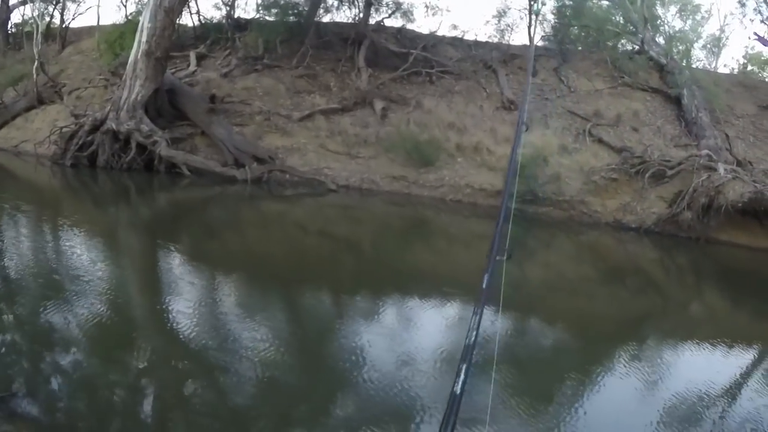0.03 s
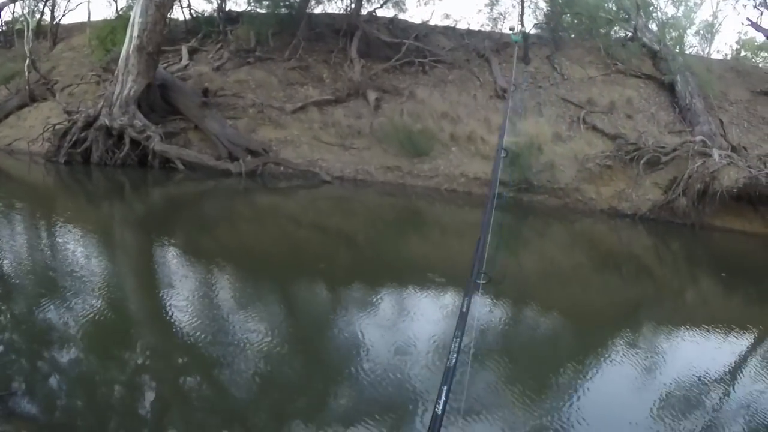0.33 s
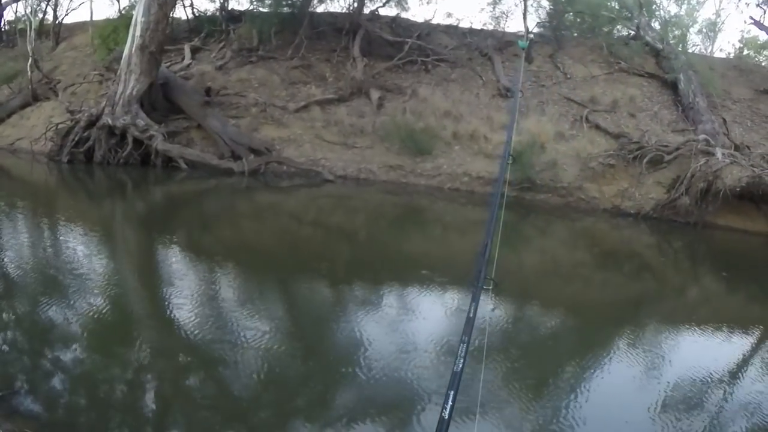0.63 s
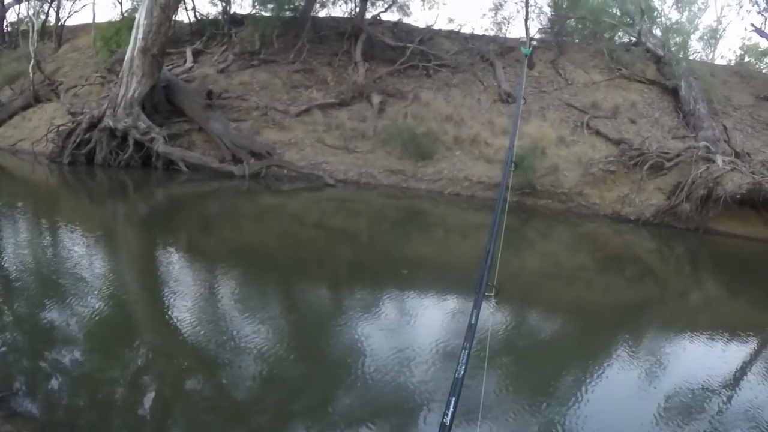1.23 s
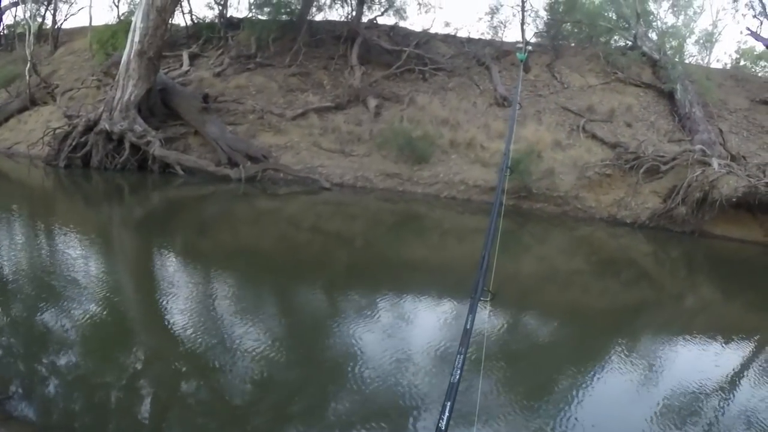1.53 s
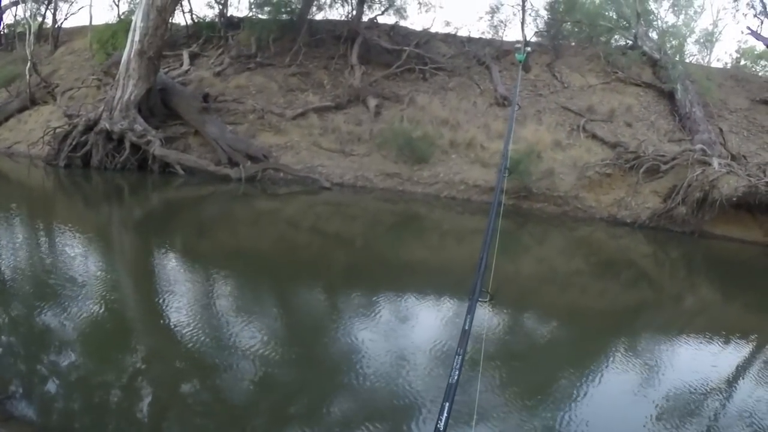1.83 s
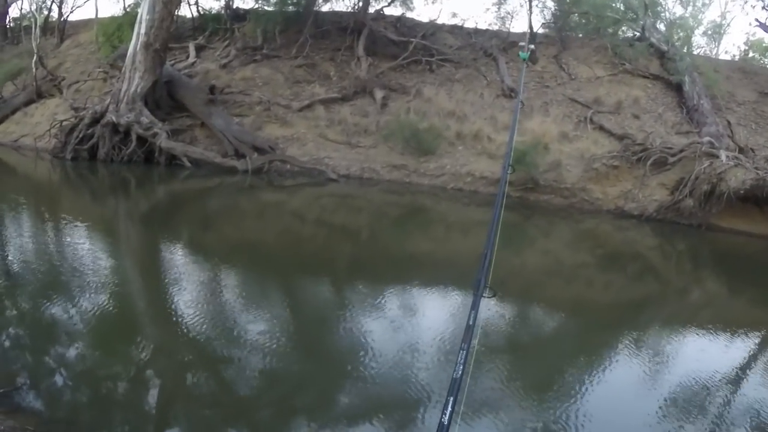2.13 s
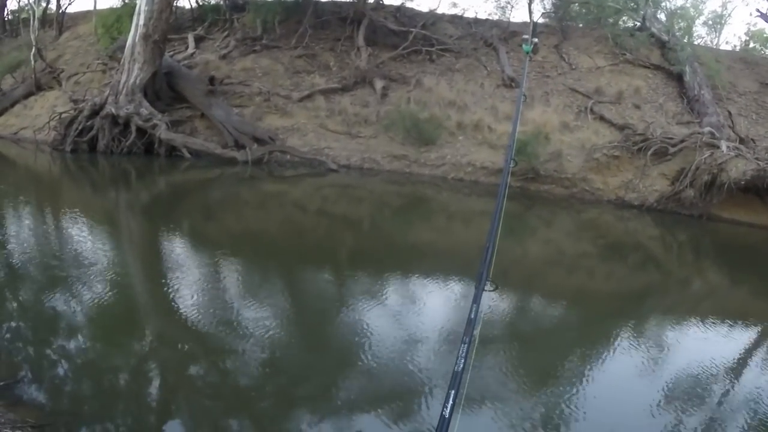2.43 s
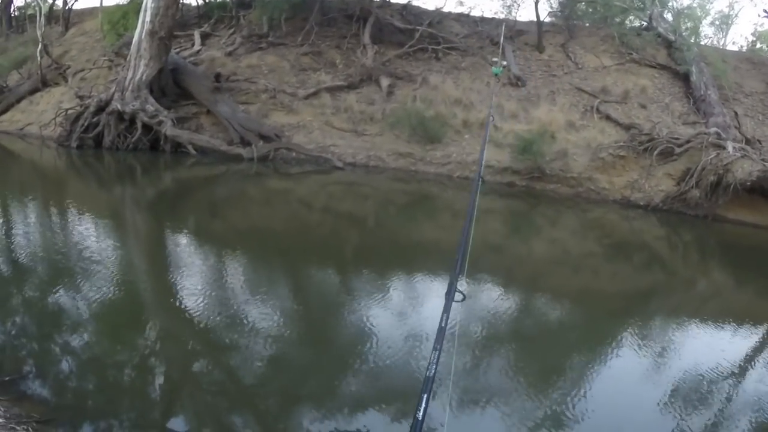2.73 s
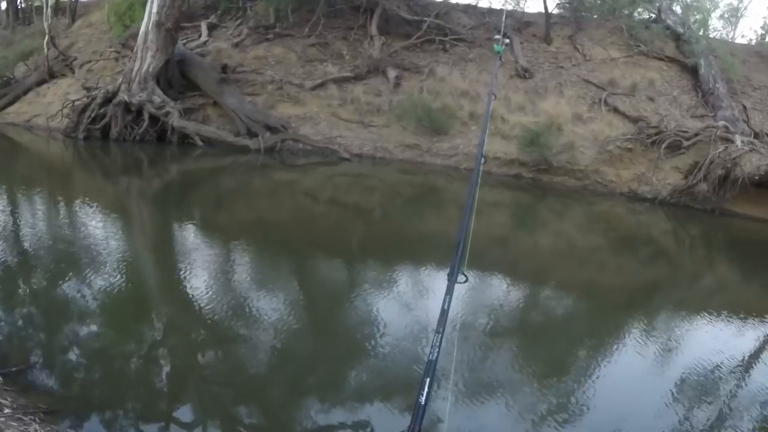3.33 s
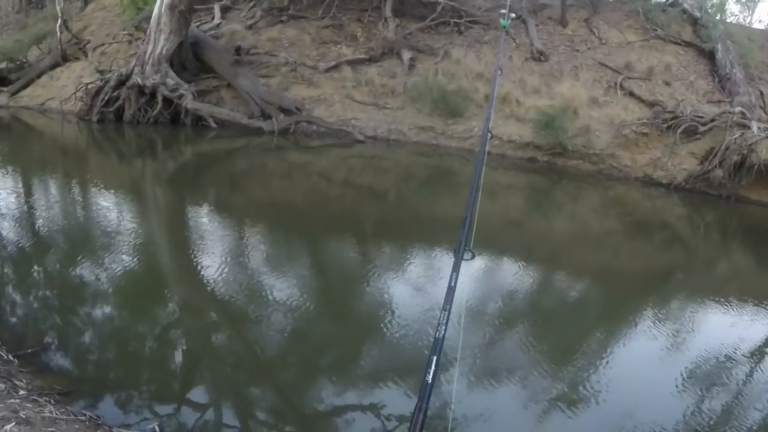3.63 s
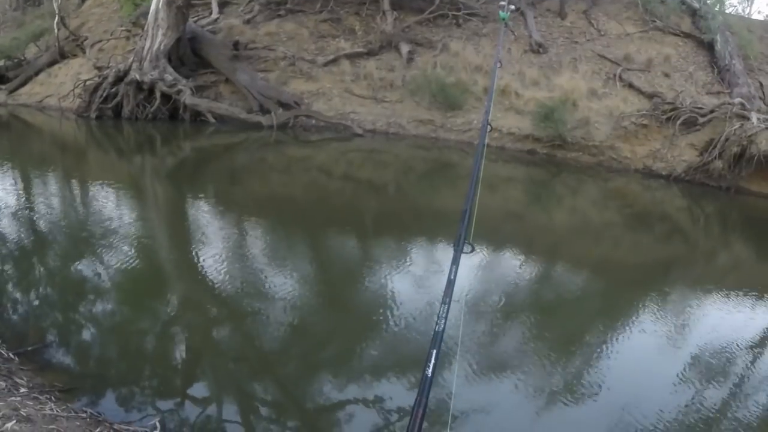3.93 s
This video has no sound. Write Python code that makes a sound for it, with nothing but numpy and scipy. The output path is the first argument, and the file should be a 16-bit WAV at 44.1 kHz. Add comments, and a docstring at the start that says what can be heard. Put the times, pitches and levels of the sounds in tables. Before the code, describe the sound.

Outdoors by a river, a little rod bell gives light, high pings over bumps of wind. After a stronger gust, the sound switches abruptly to a sheltered hiss, with close fabric rubbing and dull knocks on the microphone's housing.

```python
"""A small bell tinkles on a fishing rod tip beside a calm river while wind bumps the microphone.
A clapper strikes the bell's wall; turbulence and single eddies make the low bumps.
Halfway through, a hissier, sheltered microphone takes over: bell and wind drop out, and
the angler's clothing rubs, squeaks and knocks on the camera's case."""
import sys
import numpy as np
from scipy import signal
from scipy.fft import rfft, irfft
from scipy.io import wavfile

SR = 44100
rng = np.random.default_rng(int(sys.argv[2]) if len(sys.argv) > 2 else 0)


def store_pcm(level_fs):
    """Save levels as 16-bit WAV."""
    pcm = np.round(np.clip(level_fs, -1, 1) * 32767).astype(np.int16)
    wavfile.write(sys.argv[1], SR, np.atleast_2d(pcm).T)


N = 176400


def amp(db):
    """Decibels to gain."""
    return 10 ** (np.asarray(db) / 20)


def unit(x):
    """Scales to rms 1."""
    return x / np.sqrt(np.mean(x ** 2) + 1e-20)


def add(mix, start_s, sound):
    """Mixes a sound in at start_s."""
    part = mix[max(round(start_s * SR), 0):][:len(sound)]
    part += sound[:len(part)]


def colour(x, spectrum):
    """Filters x by (freq_hz, level_db) points, to rms 1."""
    hz, db = np.transpose(spectrum)
    gain_db = np.interp(np.log(np.fft.rfftfreq(N, 1 / SR) + 1), np.log(hz), db)
    return unit(irfft(rfft(x) * amp(gain_db), N))


def noise(spectrum):
    """Coloured noise, rms 1."""
    return colour(rng.standard_normal(N), spectrum)


def drift(rate_hz):
    """Random wander near rate_hz, rms 1."""
    f = np.fft.rfftfreq(N, 1 / SR) / rate_hz
    return unit(irfft(rfft(rng.standard_normal(N)) * f * np.exp(-f ** 2), N))


def bell():
    """The clapper strikes the wall, detuning the two lowest modes, and rattles faintly in between."""
    # clapper strikes: start_s, level_db, pitch_hz, ring_s, overtone_db
    strikes = [(0.1367, -40, 4118, 0.12, -24.5), (0.192, -51, 4100, .12, -18),
               (0.197, -40, 4110, .034, -40), (.205, -43, 4010, 0.17, -40), (0.216, -33, 4117, 0.078, -36),
               (0.2762, -40.5, 4120, 0.07, -26), (.403, -56, 4070, .13, -18),
               (.431, -48.5, 4110, .092, -23), (0.4706, -51, 4120, .1, -35), (.505, -48, 4090, .086, -24),
               (0.5427, -42, 4180, 0.039, -31), (0.551, -41.5, 4070, 0.059, -36),
               (0.56, -44, 4100, 0.052, -19), (0.587, -49, 4220, .043, -35), (.8175, -52, 4200, 0.028, -35),
               (1.079, -53.5, 4160, .03, -35), (1.2293, -43, 4110, 0.042, -21)]  # short ring: clapper stays on the wall
    # bell modes: freq_hz, level_db, t60_per_ring
    modes = [(4090, 0, 0.88), (4170, -12.5, 0.73), (4320, -14, 0.18), (5700, -23, .14)]
    nominal_hz, overtone_hz = modes[0][0], 8620
    rattle_end_s, hard_strike_db = 0.6, -37.5
    rattle = [(rattle_end_s * rng.random(), -66 + 2 * rng.standard_normal(), nominal_hz, 0.1, -20)
              for _ in range(24)]
    out, t = np.zeros(N), np.arange(SR // 4) / SR
    for start_s, level_db, pitch_hz, ring_s, overtone_db in strikes + rattle:
        ring = amp(overtone_db - 60 * t / (1.6 * ring_s)) * np.sin(2 * np.pi * overtone_hz * t)
        for k, (mode_hz, mode_db, t60_per_ring) in enumerate(modes):
            hz = mode_hz * pitch_hz / nominal_hz if k < 2 else mode_hz
            ring += amp(mode_db - 60 * t / (ring_s * t60_per_ring)) * np.sin(2 * np.pi * hz * t)
        rise_s = 0.00061 * amp((hard_strike_db - level_db) / 2)  # lighter strikes start rounder
        add(out, start_s, amp(level_db) * np.minimum(t / rise_s, 1) * ring)
    # a small bell barely radiates below its lowest mode
    return signal.sosfilt(signal.butter(20, 3950, "high", fs=SR, output="sos"), out)


def tackle_tick():
    """One light tick of the tackle."""
    # tackle modes: freq_hz, level_db
    modes = [(2940, -51), (5780, -55)]
    start_s, t60_s = 0.4605, 0.017
    t = np.maximum(np.arange(N) / SR - start_s, 0)
    return sum(amp(db - 60 * t / t60_s) * np.sin(2 * np.pi * hz * t) for hz, db in modes)


def wind():
    """Turbulence widens in band with strength; each eddy pushes, then pulls on the microphone."""
    # turbulence strength: time_s, level_db
    strength = [(0, -42.5), (.19, -40.5), (.28, -51.5), (.45, -39.5), (.6, -55.5), (1.02, -54), (1.15, -46),
                (1.29, -54), (1.4, -39.5), (1.5, -53.5), (1.61, -40.5), (1.64, -27.5), (1.77, -29),
                (1.82, -39), (2.03, -45)]
    # light wind spectrum: freq_hz, level_db
    rumble = [(12, -15), (50, 6.5), (120, -5.5), (300, -43), (700, -76)]
    # strong wind spectrum: freq_hz, level_db
    gust = [(15, -17), (60, 4.5), (180, -1.5), (300, -22), (800, -74)]
    # single eddies: centre_s, level_db, pitch_hz
    eddies = [(0.143, -30, 50), (0.202, -30.5, 68.5), (0.333, -26.5, 73), (0.415, -25, 73.4),
              (0.444, -28.5, 108), (0.489, -34.5, 100), (0.535, -29.5, 63), (0.691, -36, 63),
              (1.349, -34, 75), (1.641, -21, 84.6), (1.678, -21.5, 134), (1.698, -25, 115),
              (1.716, -24, 124), (1.763, -25, 184), (1.795, -31.5, 143)]
    gust_from_db, gust_full_db = -46.5, -27
    t = np.arange(N) / SR
    level_db = np.interp(t, *np.transpose(strength))
    blend_rad = np.interp(level_db, [gust_from_db, gust_full_db], [0, np.pi / 2])
    envelope = amp(level_db + 2 * drift(rate_hz=19.4))
    out = envelope * (np.cos(blend_rad) * noise(rumble) + np.sin(blend_rad) * noise(gust))
    for centre_s, eddy_db, pitch_hz in eddies:
        phase = 2 * np.pi * pitch_hz * (t - centre_s)
        out -= amp(eddy_db) * phase * np.exp((1 - phase ** 2) / 2)
    return out


def cloth():
    """Fibres catch and slip on the case in strokes; faster, louder strokes are brighter."""
    # cloth strokes: start_s, length_s, level_db
    strokes = [(2.024, 0.046, -43.5), (2.084, 0.017, -46), (2.195, 0.031, -38.5), (2.182, 1.82, -45),
               (2.324, 0.019, -29.5), (2.347, 0.034, -38), (2.386, 0.054, -40.5), (2.437, 0.039, -34.5),
               (2.48, 0.063, -36.5), (2.55, 0.062, -35), (2.612, 0.058, -39), (2.672, 0.082, -35.5),
               (2.752, 0.079, -36.5), (2.827, 0.047, -39.5), (2.918, .055, -39), (2.975, 0.053, -37),
               (3.047, 0.12, -41.5), (3.122, 0.062, -36.5), (3.228, 0.042, -39.5), (3.248, 0.041, -36),
               (3.292, 0.046, -38), (3.385, 0.213, -44), (3.696, 0.052, -43), (3.835, 0.034, -39.5),
               (3.898, 0.082, -44.5)]
    # slow rub spectrum: freq_hz, level_db
    dull = [(25, -33), (60, -9), (140, -4.5), (450, 0), (800, -2), (1300, -11), (2000, -21.5), (6000, -49)]
    # fast rub spectrum: freq_hz, level_db
    bright = [(50, -40), (150, 1), (400, -2.5), (800, 1), (1250, -3.5), (2000, -12), (4200, -32.5),
              (8000, -63)]
    rise_s, fall_s = 0.0058, 0.008
    dull_at_db, bright_at_db = -45, -34
    slips_per_s, spread_db, catch_db = 7000, 3, 2.5
    t, powers = np.arange(N) / SR, np.zeros((2, N))
    for start_s, length_s, level_db in strokes:
        attack = np.clip((t - start_s) / rise_s, 0, 1)
        release = np.exp(-np.maximum(t - start_s - length_s + fall_s / 2, 0) / fall_s)
        brightness = np.interp(level_db, [dull_at_db, bright_at_db], [0, 1])
        powers += np.outer([1 - brightness, brightness], (amp(level_db) * attack * release) ** 2)
    catch = unit(amp(catch_db * drift(rate_hz=98)))
    out = np.zeros(N)
    for power, spectrum in zip(powers, (dull, bright)):
        slips = (rng.random(N) < slips_per_s / SR) * rng.choice([-1, 1], N)
        sizes = amp(spread_db * np.minimum(rng.exponential(1, N), 4))
        out += np.sqrt(power) * colour(slips * sizes * catch, spectrum)
    return out


def knocks():
    """Larger snags thump the case, which hardly rings."""
    # snags: time_s, level_db, pitch_hz
    snags = [(2.301, -24.5, 347), (2.446, -21.5, 500), (2.482, -23, 248), (2.604, -24, 330),
             (2.623, -22.5, 434), (3.151, -25.5, 256), (3.154, -17.5, 603), (3.227, -22.5, 240),
             (3.8492, -23.5, 320), (3.9129, -20, 730)]
    rise_cycles, low_cut_hz = 0.27, 88
    out, t = np.zeros(N), np.arange(SR // 20) / SR
    for time_s, level_db, pitch_hz in snags:
        age = pitch_hz * t / rise_cycles
        thump = amp(level_db) * age * np.exp(1 - age) * np.sin(2 * np.pi * pitch_hz * t)
        add(out, time_s - 0.5 / pitch_hz, thump)
    return signal.lfilter(*signal.butter(2, low_cut_hz, "high", fs=SR), out)


def clacks():
    """Something hard taps the case and briefly rings its modes."""
    # hard taps: start_s, level_db
    taps = [(2.317, -38.5), (2.558, -36.5), (3.711, -42), (3.9164, -32.5), (3.9185, -30)]
    # case modes: freq_hz, level_db
    modes = [(850, 4.5), (1290, 7.5), (1803, -0.5), (2218, -3.5), (3050, -10.5)]
    t60_s = 0.012
    out, t = np.zeros(N), np.arange(SR // 20) / SR
    ring = sum(amp(db - 60 * t / t60_s) * np.sin(2 * np.pi * hz * t) for hz, db in modes)
    for start_s, level_db in taps:
        add(out, start_s, amp(level_db) * ring)
    return out


def squeak():
    """The cloth's slipping briefly turns periodic."""
    start_s, length_s, pitch_hz = 2.24, 0.076, 838
    phase = 2 * np.pi * np.cumsum(pitch_hz * (1 + 0.1 * drift(rate_hz=120))) / SR
    progress = np.clip((np.arange(N) / SR - start_s) / length_s, 0, 1)
    envelope = amp(-38.5) * np.sqrt(abs(np.sin(np.pi * progress)))
    return envelope * (np.sin(phase) + amp(-9.5) * np.sin(2 * phase))


def river_air():
    """Steady, soft air over the river."""
    # air spectrum: freq_hz, level_db
    spectrum = [(30, -8.5), (220, 2), (500, -1.5), (1000, -6.5), (4500, -17.5), (8000, -25.5),
                (12000, -32.5), (15000, -41)]
    return amp(-58.5) * noise(spectrum)


def hiss():
    """Steady noise of the sheltered microphone."""
    # hiss spectrum: freq_hz, level_db
    spectrum = [(30, -11), (70, -4), (150, 10), (400, 3.5), (1000, -10.5), (5000, -15.5), (15500, -23.5)]
    return amp(-51.5) * noise(spectrum)


def scene():
    """The open microphone hears the riverside, then the sheltered one hears the case."""
    switch_s, fade_s = 2.03, 0.0014
    switch = np.clip((np.arange(N) / SR - switch_s) / fade_s, 0, 1)
    riverside = bell() + tackle_tick() + wind() + river_air()
    sheltered = cloth() + knocks() + clacks() + squeak() + hiss()
    return ((1 - switch) * riverside + switch * sheltered)[None]


def record(dry):
    """The camera's band limit."""
    cutoff_hz = 15700
    lowpass = signal.firwin(511, cutoff_hz, window=("kaiser", 9), fs=SR)
    return signal.oaconvolve(dry, lowpass[None], "same")


dry = scene()
out = record(dry)
store_pcm(out)
```